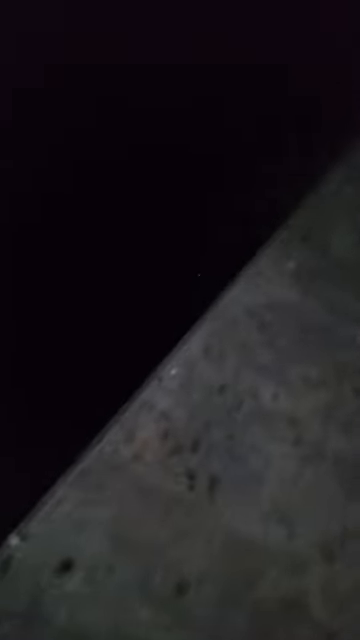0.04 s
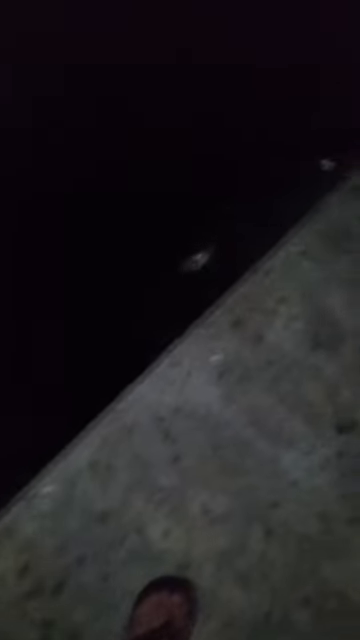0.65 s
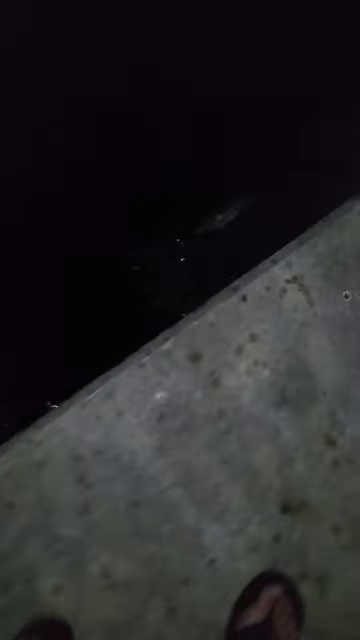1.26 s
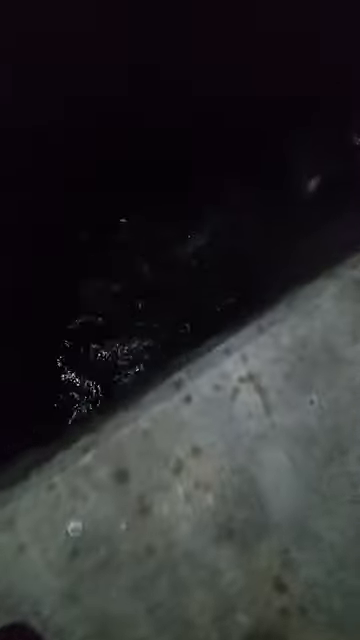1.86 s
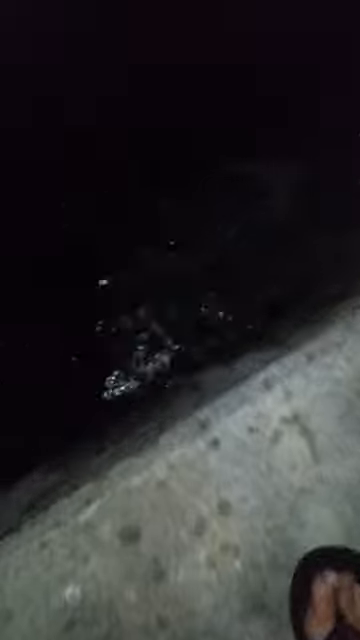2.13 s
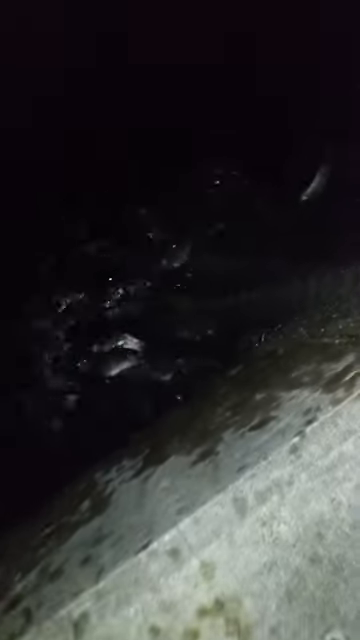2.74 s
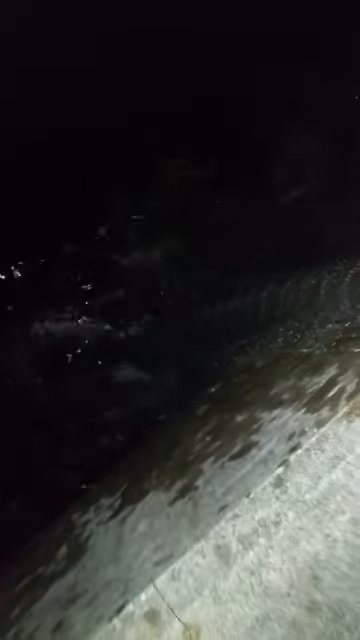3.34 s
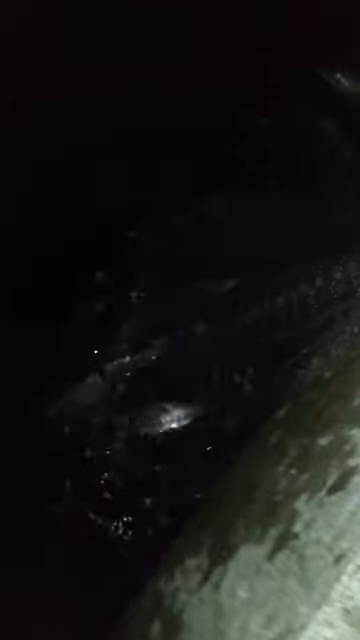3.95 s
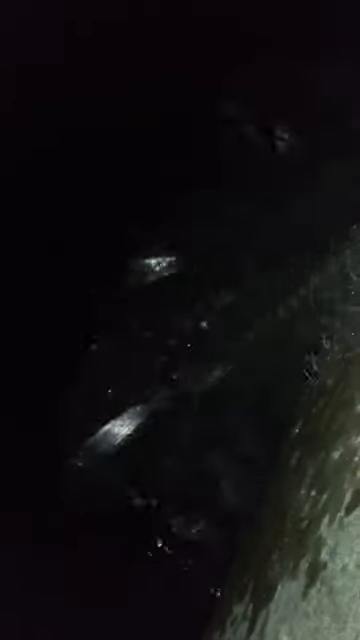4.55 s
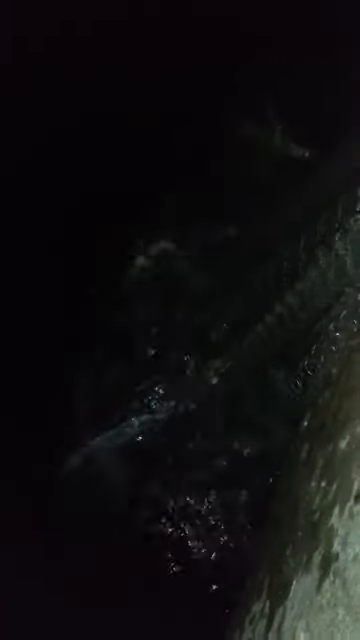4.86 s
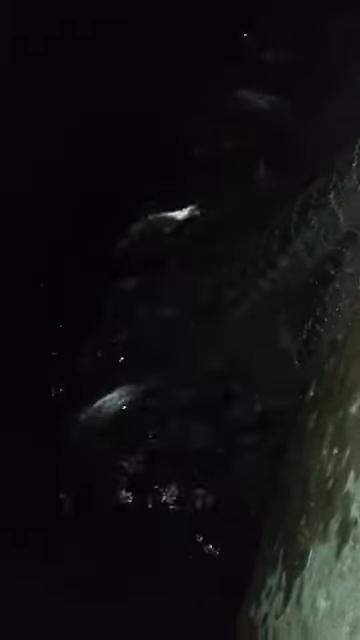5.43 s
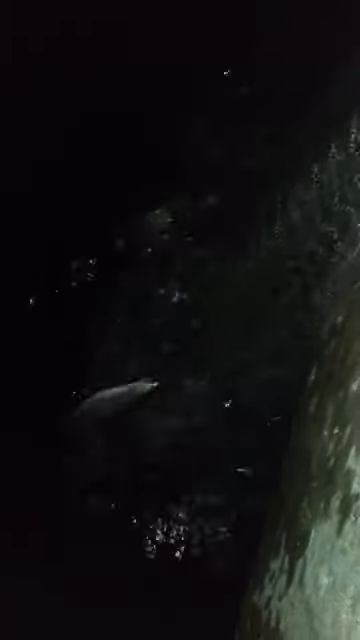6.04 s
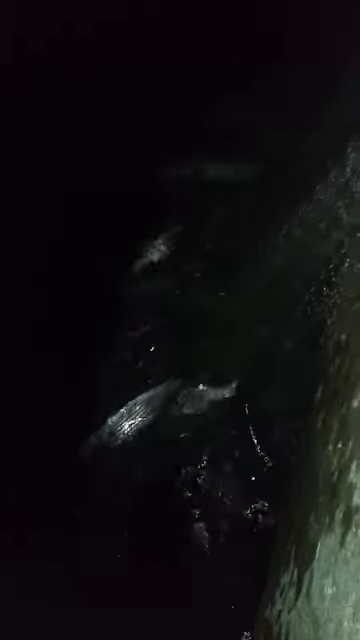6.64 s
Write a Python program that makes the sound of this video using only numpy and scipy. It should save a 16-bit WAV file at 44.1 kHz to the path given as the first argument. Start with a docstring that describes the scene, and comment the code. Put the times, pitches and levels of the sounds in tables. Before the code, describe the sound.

Irregular bursts of fish splashing, slapping and gurgling in the sea by a concrete wall, with soft microphone handling bumps.

```python
"""At the foot of a concrete seawall, at night, fish thrash at the surface of the sea.
Their tails slap the water and throw spray that patters back. Trapped air rings as rising bubbles and
plops, a hollow under the wall booms, and the wall echoes it all over a faint night hiss.
The hand-held microphone picks up soft bumps, and its ports (small openings) ring in the treble."""
import sys
import numpy as np
from scipy import signal
from scipy.fft import rfft, irfft, next_fast_len
from scipy.io import wavfile
from scipy.ndimage import uniform_filter1d

SR = 44100
rng = np.random.default_rng(int(sys.argv[2]) if len(sys.argv) > 2 else 0)


def waveform_to_disk(signal):
    """Save audio, clipped to [-1, 1], as 16-bit WAV at the path in sys.argv[1]."""
    frames = np.transpose(np.atleast_2d(signal))
    scaled = np.clip(frames, -1, 1) * 32767
    samples = np.round(scaled).astype(np.int16)
    wavfile.write(sys.argv[1], SR, samples)


N = 295029
T = np.arange(N) / SR

# Levels in the tables are relative. Pan is left minus right, so a positive pan leans left.
# The tone of six noises. Each row: frequency in Hz, level in dB.
NIGHT_TONE = [(25, -22), (60, 5), (140, 7), (300, -3), (750, -20), (1700, -22), (3000, -40), (5500, -1),
              (9000, -31)]
SLOSH_TONE = [(200, -22.5), (290, -21.5), (370, 6.5), (800, 6), (1200, 5.5), (2000, -15), (5000, -14)]
FOAM_TONE = [(300, -6.5), (500, -1), (1000, -3), (1700, 14), (2400, 3), (3100, 12), (4300, 8), (6500, 7.5)]
SPRAY_TONE = [(1500, -41.5), (3000, 5), (4700, -8), (5200, 7), (6300, 3), (7400, 4.5), (9000, 1.5),
              (10500, -5), (12000, -31), (15500, -20)]
MIST_TONE = [(8000, -9.5), (9800, 17.5), (11600, 16.5), (12600, 12.5), (15500, 10.5)]
SLAP_TONE = [(700, -6), (2000, -1), (3300, -2), (4700, 0), (6000, 0), (9000, 6), (11000, 3), (15500, -4)]
# The microphone's ports, left then right. Each row: pitch in Hz, width in Hz, boost in dB.
MIC_PORTS = [(8855, 920, 26.5), (9296, 740, 16.5)]
# Fingers bump the microphone. Each row: start in seconds, level in dB, pitch in Hz.
HAND_BUMPS = [(0.009, -58, 62), (0.367, -58, 75), (2.06, -55.5, 78.5), (2.139, -50.5, 85), (2.296, -61, 52),
              (2.715, -61, 92), (3.047, -61.5, 66.6), (3.661, -63, 69), (4.34, -62.5, 67.5),
              (5.585, -50.5, 93), (5.68, -43.5, 117), (5.717, -50, 67.6), (5.759, -52, 156),
              (5.813, -44, 113), (6.293, -44.5, 109), (6.377, -54, 86), (6.577, -44.5, 117),
              (6.621, -47.5, 78)]
# The hollow under the wall booms. Each row: start in seconds, length in seconds, level in dB.
HOLLOW_BOOMS = [(5.805, 0.076, -39), (6.055, 0.053, -46)]
# Restless water between tail strokes. Each row: time in seconds, drizzle level in dB, foam level in dB.
RESTLESS_WATER = [(0, -42, -64), (.2, -52, -63), (.56, -66, -64), (.77, -54.5, -68), (.84, -49, -63.5),
                  (1.2, -53.5, -63.5), (1.33, -61, -76), (1.55, -43.5, -57), (1.78, -40.5, -63.5),
                  (2.5, -58, -49.5), (2.95, -37, -59.5), (3.5, -37.5, -58), (3.75, -44.5, -61),
                  (4.25, -47.5, -63.5), (4.65, -38.5, -60.5), (4.95, -44, -57), (5.55, -38, -57),
                  (6.23, -45, -61.5), (6.69, -40.5, -59)]
# A rolling fish drags air under and the water gulps. Each row: start in seconds, length in seconds,
# level in dB, deep minus light bubbles in dB.
WATER_GULPS = [(0.298, 0.054, -47.5, 8), (0.864, 0.2, -54, 31), (1.572, 0.067, -40, -31),
               (1.967, 0.047, -42, 3), (2.04, 0.0092, -33, -2), (2.125, 0.078, -44.5, -23),
               (2.245, 0.081, -43, 11), (2.492, 0.14, -39, -19), (2.575, 0.25, -38.5, 4.5),
               (2.73, 0.13, -44.5, 16), (2.923, 0.063, -49, 4), (3.071, 0.015, -42, -27),
               (3.13, 0.11, -49, -1), (3.27, 0.088, -42.5, -23), (3.368, 0.2, -53.5, -1),
               (3.6, 0.15, -46, -1), (3.916, 0.1, -54, -24), (4.016, 0.027, -41, -19),
               (4.382, 0.12, -45, -8), (4.46, 0.064, -31, -25), (4.772, 0.12, -42.5, -30),
               (5.056, 0.45, -44.5, -10), (5.297, 0.016, -35, -18), (5.38, 0.063, -41, -26),
               (5.493, 0.26, -48, -11), (5.809, 0.18, -33, 7), (5.987, 0.13, -38.5, 5),
               (6.366, 0.13, -55, 20), (6.464, 0.09, -43.5, 15)]
# Air pockets close and ring. Each row: start in seconds, level in dB, pitch in Hz, ring time in seconds.
AIR_POCKETS = [(0.315, -26, 458, 0.028), (0.961, -45.5, 516, 0.063), (1.374, -41, 456, 0.059),
               (1.571, -29, 810, 0.021), (1.614, -20, 880, 0.01), (1.808, -42.5, 1220, 0.062),
               (1.83, -43, 1450, 0.052), (2.043, -20.5, 696, 0.019), (2.146, -31, 846, 0.03),
               (2.185, -33, 742, 0.044), (2.203, -41.5, 438, 0.076), (2.298, -38, 1706, 0.035),
               (2.383, -32.5, 830, 0.023), (2.549, -32, 855, 0.032), (2.742, -28, 394, 0.052),
               (2.77, -17.5, 643, 0.014), (2.84, -30.5, 1800, 0.016), (2.838, -25, 477, 0.017),
               (3.135, -39, 505, 0.076), (3.142, -27.5, 782, 0.023), (3.197, -24, 1360, 0.0087),
               (3.216, -39, 400, 0.056), (3.276, -39, 735, 0.056), (3.31, -34.5, 374, 0.055),
               (3.565, -31.5, 770, 0.031), (3.637, -35.5, 490, 0.047), (3.704, -29.5, 540, 0.027),
               (4.016, -36, 870, 0.027), (4.048, -31, 734, 0.029), (4.197, -38.5, 3200, 0.015),
               (4.403, -31.5, 920, 0.023), (4.408, -38, 544, 0.063), (4.483, -21, 884, 0.036),
               (4.492, -28, 450, 0.046), (4.518, -33, 743, 0.02), (4.709, -28.5, 766, 0.027),
               (4.807, -31, 700, 0.053), (4.838, -32, 840, 0.039), (4.873, -32, 898, 0.041),
               (4.941, -36, 655, 0.028), (4.976, -34, 1030, 0.04), (5.106, -34, 950, 0.037),
               (5.167, -23, 880, 0.016), (5.289, -18, 633, 0.0096), (5.429, -32.5, 521, 0.069),
               (5.779, -31.5, 490, 0.032), (5.801, -22.5, 483, 0.025), (5.871, -28.5, 374, 0.063),
               (6.004, -22.5, 743, 0.03), (6.023, -21, 460, 0.023), (6.101, -27.5, 794, 0.023),
               (6.146, -25, 897, 0.018), (6.369, -17.5, 2870, 0.0062), (6.56, -21, 783, 0.014)]
# Tail strokes throw water. Each row: start in seconds, length in seconds, spray level in dB, pan in dB,
# foam level in dB, mist compared with the spray in dB.
TAIL_STROKES = [(0.318, 0.018, -38, -3, -52, -4), (0.377, 0.11, -39.5, 1.5, -62, 0),
                (0.606, 0.019, -47, -4, -76, 1), (0.847, 0.047, -40, -9, -59, -4),
                (1.073, 0.038, -39, 3, -56, 0.5), (1.372, 0.093, -45, -9, -80, 5),
                (1.537, 0.036, -42, -2, -50, -9), (1.615, 0.014, -29.5, 1, -53, 1),
                (1.702, 0.012, -40.5, 2, -53, -10), (1.737, 0.014, -56, 14, -54, -12),
                (1.82, 0.13, -42.5, 4, -55, -11), (1.912, 0.21, -38.5, -1.5, -51, 2.5),
                (2.045, 0.017, -33, 0, -41, -6), (2.07, 0.35, -42, -0.5, -79, 2),
                (2.344, 0.48, -39, -7, -56, 0.5), (2.571, 0.063, -31, -1, -41.5, 2),
                (2.642, 0.26, -45.5, 2, -49.5, 8.5), (2.983, 0.11, -34, -0.5, -100, -1.5),
                (3.109, 0.037, -34, -3, -50, 3), (3.171, 0.054, -37, -6, -48, -7),
                (3.306, 0.02, -30.5, 0, -50.5, 5), (3.404, 0.037, -65, -1, -47.5, 9),
                (3.516, 0.053, -40.5, -1, -74, 6), (4.092, 0.01, -42.5, 5, -84, -7),
                (4.361, 0.095, -37, 7, -55, 8.5), (4.457, 0.082, -33, 6, -47.5, -2),
                (4.596, 0.035, -41, 14, -56, -19), (4.708, 0.15, -36, 10, -51.5, -1),
                (5.101, 0.058, -33.5, 5, -50, -26), (5.156, 0.064, -29, -1, -44, 0.5),
                (5.275, 0.13, -37, 6, -55, -4), (5.402, 0.034, -31.5, 8, -44, 1.5),
                (5.512, 0.029, -42, 12, -57, -18), (5.6, 0.062, -36, 8, -62, -14),
                (5.7, 0.045, -28, 4.5, -44, 1), (5.751, 0.061, -34.5, -1, -50, 14.5),
                (5.805, 0.16, -31, 6, -48, 4), (5.985, 0.046, -36.5, 6, -55, 0),
                (6.055, 0.039, -40.5, 3, -52.5, 11.5), (6.258, 0.047, -41, 19, -92, -16),
                (6.325, 0.082, -38.5, 11, -51.5, 1.5), (6.647, 0.0092, -40, -7, -61, 11)]
# Fins and heavy drops slap the sea. Each row: start in seconds, level in dB, pan in dB.
FIN_SLAPS = [(0.3466, -25, 2), (0.377, -30, 1), (0.3803, -28, 1), (0.3858, -30, 5), (0.479, -28, 0),
             (0.8688, -35, -1), (0.8878, -32, -4), (1.097, -34, -4), (1.1118, -32, -4), (1.4062, -34, -5),
             (1.6262, -21, -2), (1.6326, -22, -2), (1.7556, -34, -3), (2.015, -28, -7), (2.0595, -24, 0),
             (2.1693, -23.5, -11), (2.3232, -29, -15), (2.384, -30, -8), (2.5872, -23, -6),
             (2.7006, -21, -7), (2.7255, -22, -14), (2.8068, -27, 1), (3.0045, -25.5, -5),
             (3.1345, -26, -7), (3.1414, -23, -8), (3.2824, -33, -6), (3.3153, -25, 0), (3.4396, -28, -11),
             (3.527, -31, -6), (3.5358, -27, -6), (3.5644, -17.5, -10), (4.109, -33, 8), (4.3854, -24.5, 0),
             (4.404, -24, 4), (4.421, -26, 4), (4.4725, -25, 8), (4.6335, -33, 13), (4.7826, -26, 10),
             (4.9782, -39, 12), (5.167, -18, -2), (5.3349, -25, 8), (5.4205, -24, 11), (5.6063, -28, 4),
             (5.6416, -28, 5), (5.7136, -23.5, 6), (5.862, -21, 3), (5.8812, -19.5, 8), (5.9205, -23, 6),
             (5.9292, -17.5, -2), (6.2888, -34, 21), (6.403, -32, 10), (6.659, -28.5, -11)]

THROW_S = 0.01   # how long a stroke's foam takes to swell
GULP_RISE_S, GULP_FALL_DB_PER_S = 0.0054, 245


def from_db(db):
    return 10 ** (np.asarray(db) / 20)


def rms_one(x):
    """Scale a stereo sound so that the average of its two sides has a level (rms) of 1."""
    return x / np.sqrt(np.mean(x.mean(0) ** 2) + 1e-20)


def panned(db):
    """Left and right gains for a level difference."""
    pair = from_db(np.array([db, -db]).reshape(2, -1) / 2)
    return pair / np.sqrt(np.mean(pair ** 2, 0))


def add(out, start_s, sound):
    """Mix a sound in at a given time."""
    i = int(np.clip(start_s * SR, 0, N - 1))
    out[:, i:i + sound.shape[1]] += sound[:, :N - i]


def coloured(x, tone):
    """Filter a sound with one of the tone tables."""
    size = 2 * next_fast_len(N // 2 + SR // 10)
    hz, db = np.transpose(tone)
    curve_db = np.interp(np.log(np.fft.rfftfreq(size, 1 / SR) + 1), np.log(hz), db)
    cepstrum = irfft(np.log(from_db(curve_db)))
    cepstrum[1:size // 2] *= 2   # folded so that the filter rings only after a hit, never before
    cepstrum[size // 2 + 1:] = 0
    return irfft(rfft(x, size) * np.exp(rfft(cepstrum)), size)[:, :N]


def evened(x, span_s):
    """Even out slow changes in level and keep the fast grain."""
    return x / np.sqrt(uniform_filter1d(x.mean(0) ** 2, int(span_s * SR) + 1) + 1e-12)


def hiss(alike):
    """Stereo white noise; its two sides are unrelated at 0 and the same at 1."""
    mid, side = rng.standard_normal((2, N))
    return rms_one(np.sqrt(1 + alike) * mid + np.sqrt(1 - alike) * np.array([side, -side]))


def night_air():
    """A faint, steady rumble and hiss lie behind everything."""
    return rms_one(coloured(hiss(alike=0.85), NIGHT_TONE))


def mic_ports(x):
    """Each microphone port rings at its own pitch and lets the rest through more weakly."""
    out = []
    for side, (hz, width_hz, boost_db) in zip(x, MIC_PORTS):
        ring = signal.lfilter(*signal.iirpeak(hz, hz / width_hz, fs=SR), side)
        out.append(side * from_db(-boost_db) + ring)
    return np.array(out)


def handling(thud_db, rub_db):
    """Fingers shift on the case: dull thuds on the left, and a rubbing rumble that leans left."""
    thuds, pressure = np.zeros((2, 2, N))
    t = np.arange(SR // 4) / SR
    rub_tone = [(25, -33), (60, 0.5), (130, -17.5), (200, -20), (300, -33), (700, -55)]   # Hz, dB
    rub = rms_one(coloured(hiss(alike=0.13), rub_tone))
    press = np.ones((2, 1)) * (1 - np.exp(-t / 0.0063)) * np.exp(-t / 0.046)
    for start, db, hz in HAND_BUMPS:
        add(thuds, start, from_db(db + thud_db) * ringing(hz, cycles=3.84, climb=0, lag_s=0))
        add(pressure, start - 0.01, from_db(db + rub_db) * press)
    thuds = signal.sosfilt(signal.butter(2, 45, "high", fs=SR, output="sos"), thuds)
    return thuds * panned(db=32) + pressure * evened(rub, span_s=0.054) * panned(db=11.5)


def seawall(x, fade_s, echo_db, patterns=5, changes_per_s=9):
    """The wall and the ripples add a short echo, whose pattern keeps changing as the water moves."""
    t = np.arange(SR // 4) / SR
    tails = rng.standard_normal((patterns, 2, len(t))) * from_db(-60 * t / fade_s) * (t > 0.004)
    tails /= np.sqrt(np.sum(tails ** 2, 2, keepdims=True))
    echo = 0
    for k, tail in enumerate(tails):
        turn = np.minimum((T * changes_per_s - k) % patterns, 2)   # each fades in and out in turn
        echo = echo + signal.oaconvolve(x * np.sin(np.pi / 2 * turn), tail, axes=1)[:, :N]
    return x + from_db(echo_db) * echo


def pushes(starts, lengths, levels_db, rise_s, fall_db_per_s):
    """Level of pushes of water: each rises, is strongest midway, then dies away."""
    times = T[::32]   # the level moves slowly, so a few points are enough
    power = 0
    for start, length, db, rise in zip(starts, lengths, levels_db, np.broadcast_to(rise_s, len(starts))):
        t = np.maximum(times - start, 0)
        after = np.maximum(t - length, 0)
        onset = np.sin(np.pi / 2 * np.minimum(t / rise, 1)) ** 2
        arch_db = 3 * (np.sin(np.pi * (t - after) / length) - 2 / np.pi)
        stragglers = from_db(-34 - 45 * after)   # late drops and bubbles
        fall = np.hypot(from_db(-fall_db_per_s * after), stragglers)
        power = power + (from_db(db + arch_db) * onset * fall) ** 2
    return np.interp(T, times, np.sqrt(power))


def hollow(hz, width_hz):
    """Churning water sets the air in a gap under the wall booming."""
    band = signal.butter(2, [hz - width_hz / 2, hz + width_hz / 2], "band", fs=SR, output="sos")
    boom = evened(signal.sosfilt(band, hiss(alike=0.98)), span_s=0.45)
    return boom * pushes(*np.transpose(HOLLOW_BOOMS), rise_s=0.0053, fall_db_per_s=276)


def restless_water():
    """The drizzle and foam levels between strokes, in dB, for every sample."""
    times, drizzle_db, foam_db = np.transpose(RESTLESS_WATER)
    return np.interp(T, times, drizzle_db), np.interp(T, times, foam_db)


def spurts(per_s, depth_db, rise_s):
    """Water comes in spurts: a gain that swells at random moments and sinks back."""
    kicks = (rng.random(N) < per_s / SR) * rng.exponential(1, N)
    swell = np.sqrt(signal.lfilter([1], [1, -np.exp(-2 * per_s / SR)], kicks + 1e-9))
    return from_db(depth_db * uniform_filter1d(np.minimum(swell, 2), int(rise_s * SR) + 1))


def patter(per_s, spread_db, lag_s, scatter_db, mist):
    """Drops of uneven size land at random, each from its own direction, over a smooth mist."""
    size = from_db(spread_db * np.minimum(rng.exponential(1, N), 4.5)) * rng.choice([-1, 1], N)
    hits = np.flatnonzero(rng.random(N) < per_s / SR)
    lean, bearing = rng.standard_normal((2, N))[:, hits]
    left, right = size[hits] * panned(scatter_db * lean)
    left_delay = np.round(lag_s * SR * (1 + bearing)).astype(int)
    out = np.zeros((2, N))
    np.add.at(out[0], np.clip(hits + left_delay, 0, N - 1), left)
    out[1, hits] = right
    return rms_one(out) + mist * hiss(alike=0.074)


def droplets(per_s, low_hz, high_hz, width_hz, burst_s, spread_db, scatter_db):
    """Big drops land one by one, each a tiny burst of noise around a pitch of its own."""
    out, t = np.zeros((2, N)), np.arange(SR // 80) / SR
    for k, (when, pitch, size, bearing) in enumerate(rng.random((int(per_s * N / SR), 4))):
        hz = low_hz * (high_hz / low_hz) ** pitch
        splat = rng.standard_normal((2, len(t))) * t * np.exp(-t / burst_s)
        splat = signal.lfilter(*signal.iirpeak(hz, hz / width_hz, fs=SR), splat)
        gains = from_db(spread_db * size ** 2) * panned(scatter_db * (2 * bearing - 1))
        add(out, (k + 2 * when) / per_s, gains * splat)
    return rms_one(out)


def ringing(hz, cycles, climb, lag_s, swell_per_cycle=0.59):
    """A tone swells and dies away; its pitch can climb, as a bubble's does near the surface."""
    life_s = cycles / hz
    t = np.maximum(np.arange(int(life_s * SR) + 2) / SR - [[lag_s], [0]], 0)   # the left side lags
    swell = 1 - np.exp(-swell_per_cycle * hz * t)
    phase = 2 * np.pi * hz * t * (1 + climb * t / life_s / 2)
    return swell * from_db(-60 * t / life_s) * np.sin(phase)


def bubbles(low_hz, high_hz, cycles, climb, spread_db, lag_s, scatter_db, count):
    """A cloud of ringing bubbles, most of them of middle size and a little to the right."""
    out = np.zeros((2, N))
    draws = rng.random((count, 6))
    sides = panned(-4.5 + scatter_db * rng.uniform(-1, 1, count)).T
    for (when, pitch_a, pitch_b, size, life, bearing), side in zip(draws, sides):
        hz = low_hz * (high_hz / low_hz) ** ((pitch_a + pitch_b) / 2)
        ring = ringing(hz, cycles * (0.5 + life), climb, 2 * lag_s * bearing)
        add(out, when * N / SR, from_db(spread_db * size ** 2) * side[:, None] * ring)
    return rms_one(out)


def gulping(cloud, resting_db, split_hz=600):
    """Each gulp stirs its own mix of the deep and the light bubbles in a cloud."""
    starts, lengths, db, deep_db = np.transpose(WATER_GULPS)
    out = 0
    for kind, share in zip(("low", "high"), panned(deep_db)):
        split = signal.butter(2, split_hz, kind, fs=SR, output="sos")
        band = signal.sosfilt(np.vstack([split, split]), cloud)
        level = pushes(starts, lengths, db + 20 * np.log10(share), GULP_RISE_S, GULP_FALL_DB_PER_S)
        out = out + np.hypot(level, from_db(resting_db)) * band
    return out


def smacks(above_foam_db, fade_s):
    """Level of the brief smack as the tail first hits the water in each stroke."""
    out, t = np.zeros((1, N)), np.arange(SR // 10)[None] / SR
    for start, _, _, _, foam_db, _ in TAIL_STROKES:
        add(out, start + THROW_S / 2, from_db(foam_db + above_foam_db) * np.exp(-t / fade_s))
    return out


def churn():
    """Large bubbles gurgle in each gulp; small ones fizz and drops splat in each stroke's foam."""
    large = bubbles(low_hz=392.5, high_hz=1567, cycles=28, climb=0.29,
                    spread_db=14, lag_s=0.000081, scatter_db=-2, count=900)
    slosh = patter(per_s=1100, spread_db=5.5, lag_s=0.00023, scatter_db=-3.5, mist=0.67)
    slosh = rms_one(coloured(slosh, SLOSH_TONE))
    gurgle = evened(large + 0.55 * slosh, span_s=0.15)

    small = bubbles(low_hz=834, high_hz=5270, cycles=28, climb=0.21,
                    spread_db=11.5, lag_s=0.00011, scatter_db=7, count=3400)
    foam = patter(per_s=1000, spread_db=3.5, lag_s=0.00015, scatter_db=4, mist=0.5)
    foam = rms_one(coloured(foam, FOAM_TONE))
    splats = droplets(per_s=90, low_hz=1400, high_hz=5000, width_hz=700,
                      burst_s=0.001, spread_db=14, scatter_db=7)
    surge = spurts(per_s=21, depth_db=7.5, rise_s=0.0021)
    fizz = evened((1.23 * small + foam + splats) * surge, span_s=0.11)

    starts, lengths, _, _, foam_db, _ = np.transpose(TAIL_STROKES)
    _, resting_db = restless_water()
    strokes = pushes(starts, lengths, foam_db, THROW_S, fall_db_per_s=246)
    gulps = pushes(*np.transpose(WATER_GULPS)[:3], GULP_RISE_S, GULP_FALL_DB_PER_S)
    stirred = np.hypot(strokes, from_db(-17) * gulps)   # gulps shed some foam too
    return (from_db(-8) * gulping(gurgle, resting_db - 1)
            + np.hypot(stirred, from_db(resting_db)) * fizz
            + smacks(above_foam_db=2, fade_s=0.037) * foam)


def plops(gain_db, shed_db, swell_per_cycle=0.54, climb_per_s=2.6, lag_s=0.00008):
    """An air pocket closes, chirps upward while it rings and sheds two short-lived bubbles."""
    out = np.zeros((2, N))
    for (start, db, hz, ring_s), draws in zip(AIR_POCKETS, rng.random((len(AIR_POCKETS), 2, 2))):
        cycles, climb = hz * ring_s, climb_per_s * ring_s
        add(out, start, from_db(db + gain_db) * ringing(hz, cycles, climb, lag_s, swell_per_cycle))
        for late, pitch in draws:
            shed = ringing(hz * 2 ** (0.98 * pitch), cycles / 2, climb, lag_s, swell_per_cycle)
            add(out, start + 0.056 * late, from_db(db + shed_db) * shed)
    return out


def thrown_water(levels_db, drizzle_gain_db, firm_db=-31):
    """Left and right level of the water that the strokes throw up, over the drizzle between them."""
    starts, lengths, force_db, pan_db, _, _ = np.transpose(TAIL_STROKES)
    rise_s = np.minimum(0.019 * np.exp(0.1 * (firm_db - force_db)), lengths)   # weak ones swell slowly
    sides = [pushes(starts, lengths, levels_db + 20 * np.log10(side), rise_s, fall_db_per_s=219)
             for side in panned(pan_db)]
    drizzle_db, _ = restless_water()
    return np.hypot(sides, from_db(drizzle_db + drizzle_gain_db))


def spray():
    """Thrown water patters back as fine and coarse drops, with tiny ringing bubbles and hissing mist."""
    fine = patter(per_s=1600, spread_db=2, lag_s=0.00016, scatter_db=3, mist=0.5)
    pings = bubbles(low_hz=4140, high_hz=15900, cycles=26, climb=0.1,
                    spread_db=19, lag_s=0.00015, scatter_db=9, count=1800)
    coarse = droplets(per_s=150, low_hz=5000, high_hz=15000, width_hz=4500,
                      burst_s=0.0008, spread_db=12, scatter_db=8)
    drops = fine + from_db(-6) * pings + from_db(-2) * coarse
    drops = rms_one(mic_ports(coloured(drops, SPRAY_TONE)))
    mist = patter(per_s=1300, spread_db=3, lag_s=0.00051, scatter_db=3, mist=0.6)
    mist = rms_one(coloured(mist, MIST_TONE))

    _, _, spray_db, _, _, mist_db = np.transpose(TAIL_STROKES)
    surge = spurts(per_s=40, depth_db=5.5, rise_s=0.004)
    drops = evened(drops * surge, span_s=0.037) * thrown_water(spray_db, drizzle_gain_db=-7.5)
    mist = evened(mist * surge, span_s=0.044) * thrown_water(spray_db + mist_db, drizzle_gain_db=-8)
    return from_db(-3) * drops + from_db(-12) * mist


def slaps(crack_s, splatter_s, swell_s, splatter_db, snap_db, clap_within_s, clap_db):
    """A flat hit snaps and cracks, the water claps shut behind it, then splatters."""
    out, t = np.zeros((2, N)), np.arange(SR // 10) / SR
    splatter = from_db(splatter_db) * (1 - np.exp(-t / swell_s)) * np.exp(-t / splatter_s)
    snap = from_db(snap_db) * (np.arange(len(t)) == int(crack_s * SR))
    clap_delays = clap_within_s * rng.uniform(0.5, 1, len(FIN_SLAPS))
    for (start, db, pan_db), delay in zip(FIN_SLAPS, clap_delays):
        noise = rng.standard_normal((2, len(t)))
        crack = mic_ports(noise * t * np.exp(-t / crack_s))
        crack /= np.abs(crack).max(1, keepdims=True)
        strength = from_db(db + 2.5) * panned(pan_db)
        add(out, start, strength * (snap + crack + mic_ports(noise * splatter)))
        add(out, start + delay, strength * from_db(clap_db) * crack)
    return coloured(out, SLAP_TONE)


def scene():
    """Water and splashes echo off the wall; the hand bumps and the night air have no echo."""
    water = churn() + plops(gain_db=2, shed_db=-5.5) + hollow(hz=358, width_hz=14.3)
    water *= panned(db=-0.04)
    splashes = spray() + slaps(crack_s=0.0007, splatter_s=0.005, swell_s=0.0013, splatter_db=-15,
                               snap_db=-2, clap_within_s=0.004, clap_db=-7)
    night = from_db(-69) * night_air()
    hand = handling(thud_db=34.5, rub_db=4.5)
    return seawall(water + splashes, fade_s=0.092, echo_db=-4.5) + hand + night


def record(dry):
    """The very highest treble is cut off steeply."""
    cutoff_hz = 15700
    return signal.sosfilt(signal.ellip(12, 0.1, 80, cutoff_hz, fs=SR, output="sos"), dry)


dry = scene()
out = record(dry)
waveform_to_disk(out)
```